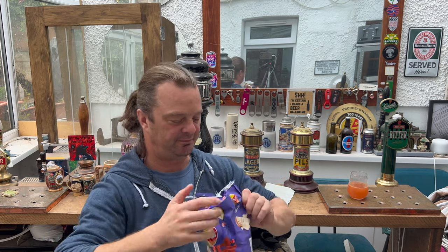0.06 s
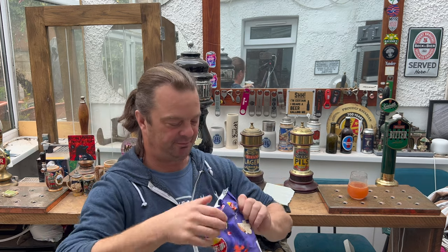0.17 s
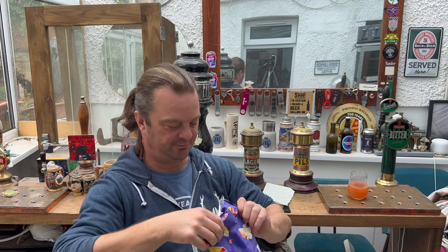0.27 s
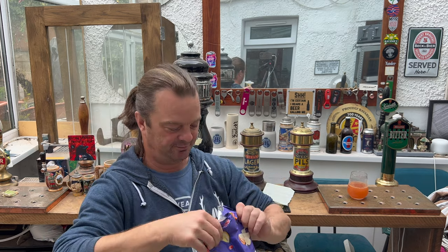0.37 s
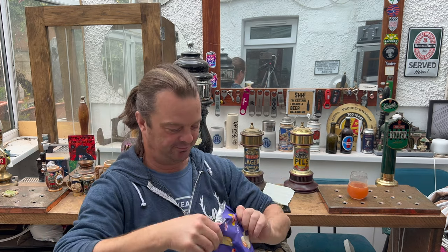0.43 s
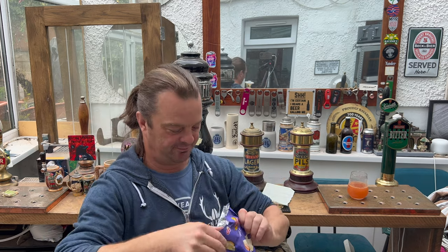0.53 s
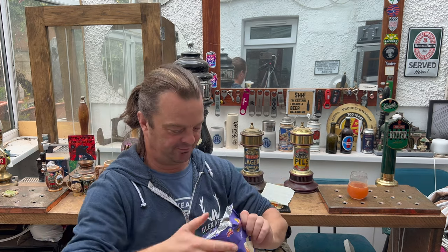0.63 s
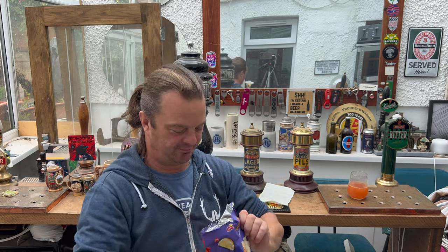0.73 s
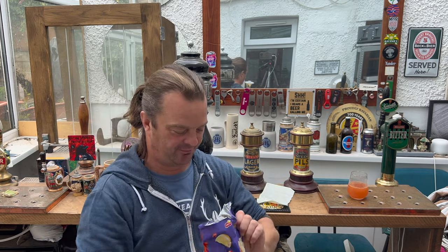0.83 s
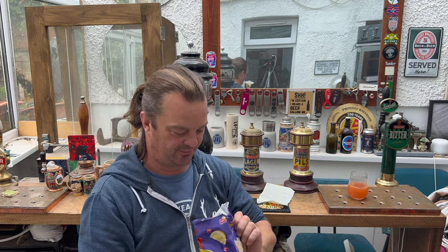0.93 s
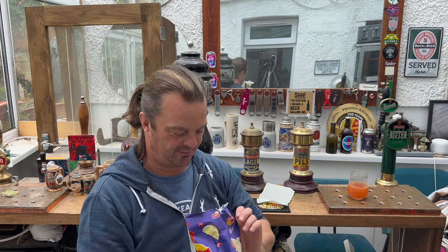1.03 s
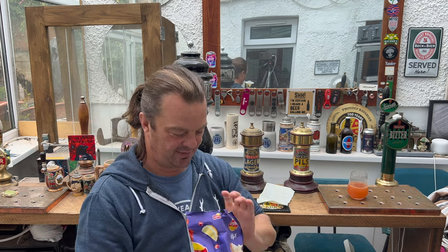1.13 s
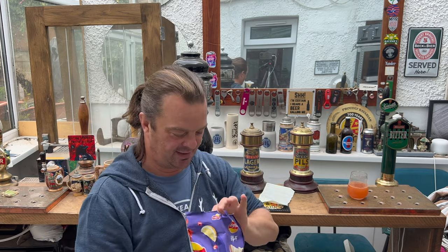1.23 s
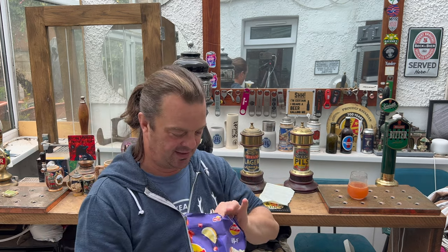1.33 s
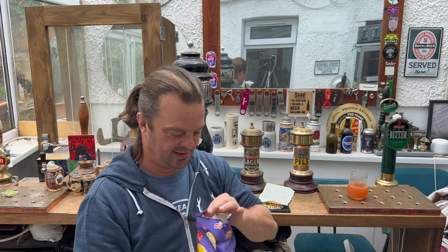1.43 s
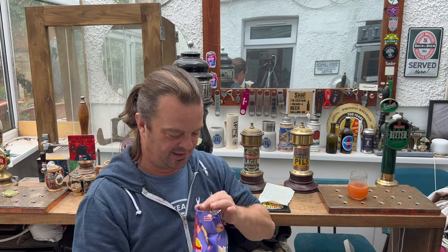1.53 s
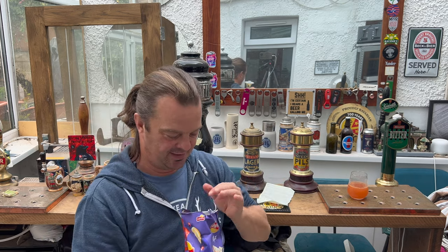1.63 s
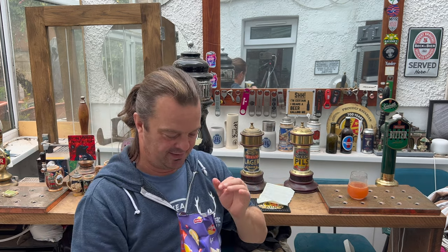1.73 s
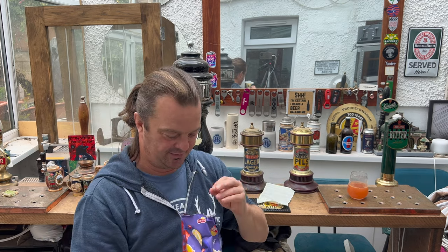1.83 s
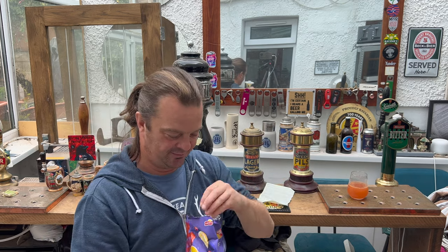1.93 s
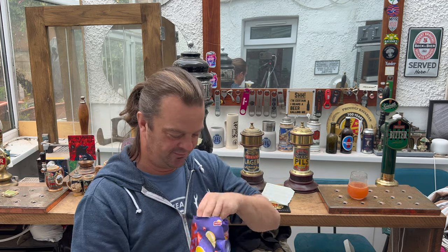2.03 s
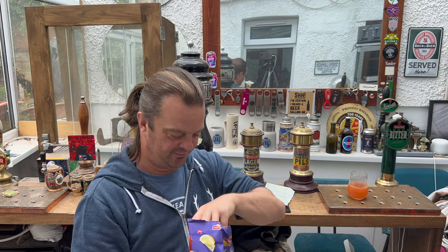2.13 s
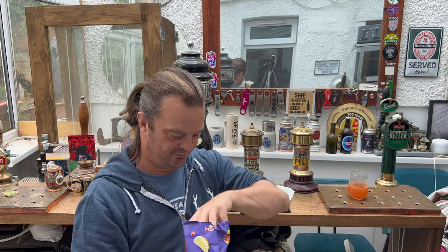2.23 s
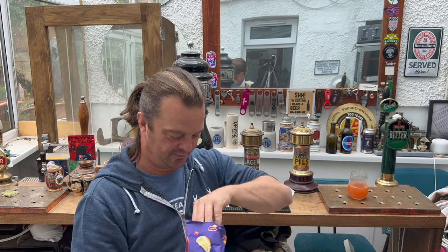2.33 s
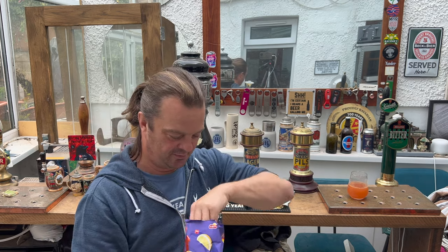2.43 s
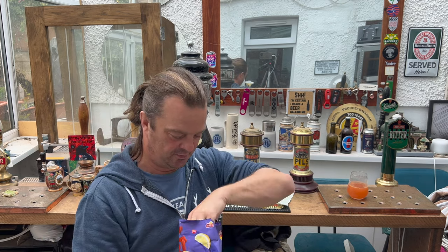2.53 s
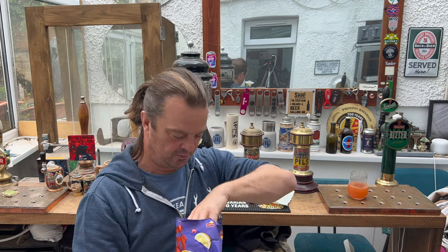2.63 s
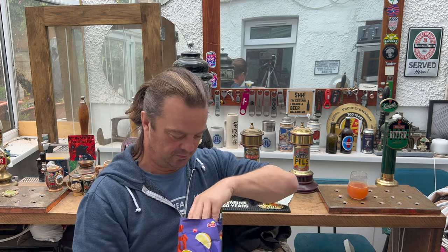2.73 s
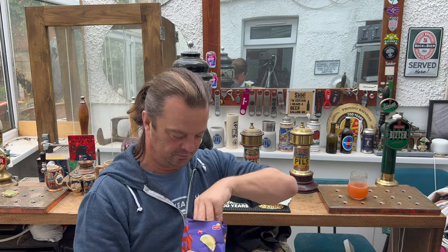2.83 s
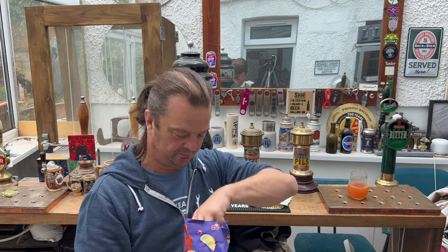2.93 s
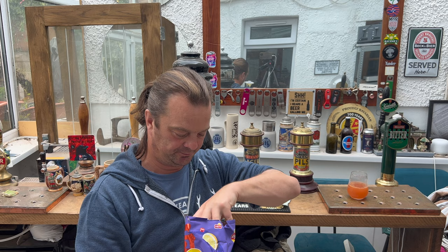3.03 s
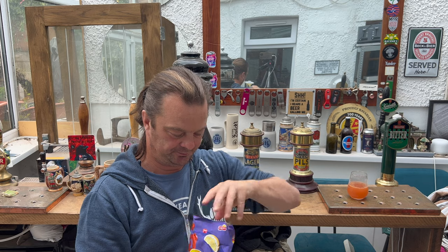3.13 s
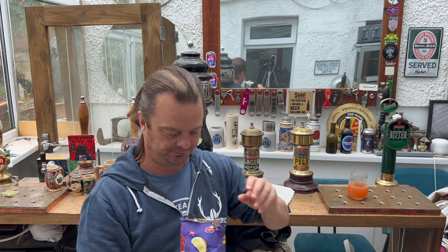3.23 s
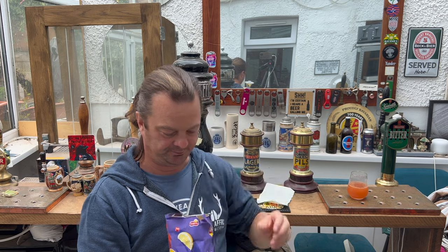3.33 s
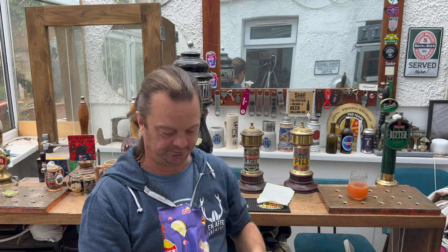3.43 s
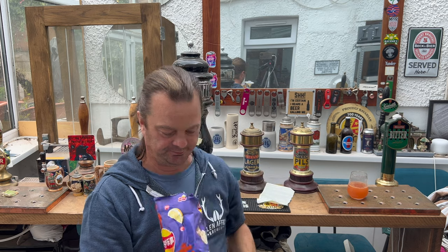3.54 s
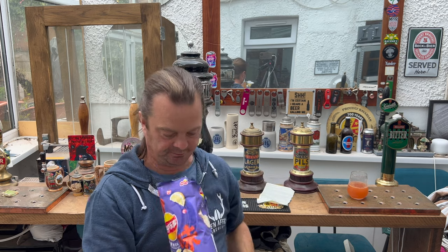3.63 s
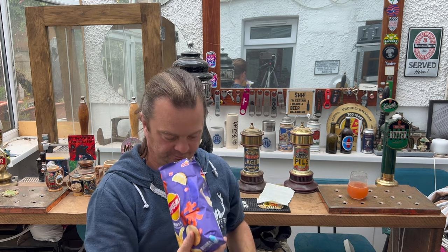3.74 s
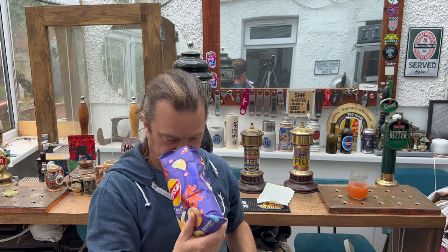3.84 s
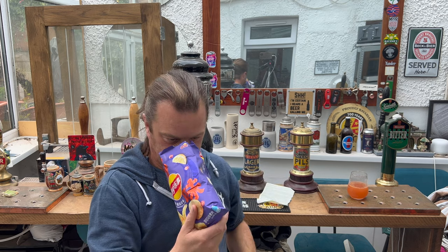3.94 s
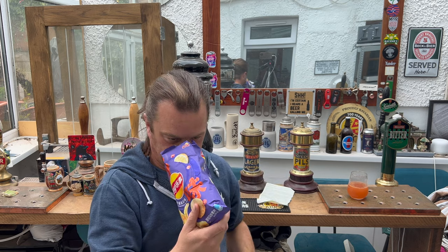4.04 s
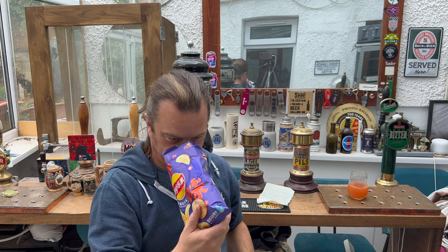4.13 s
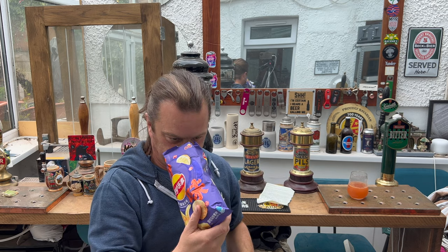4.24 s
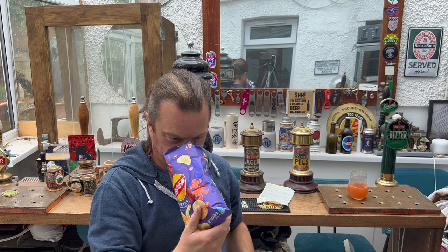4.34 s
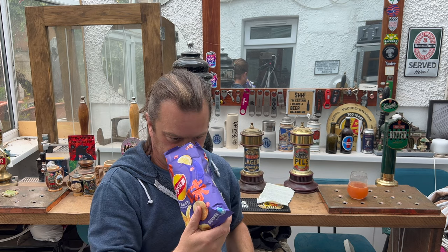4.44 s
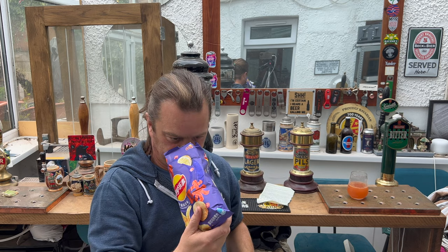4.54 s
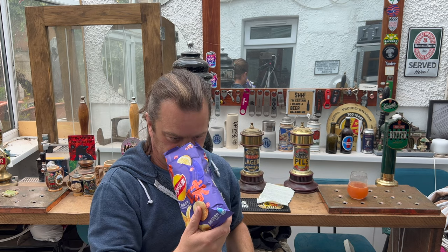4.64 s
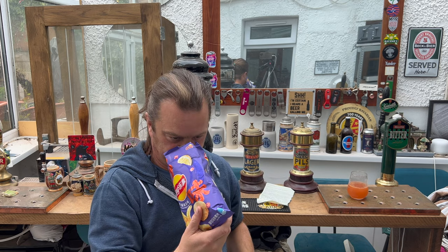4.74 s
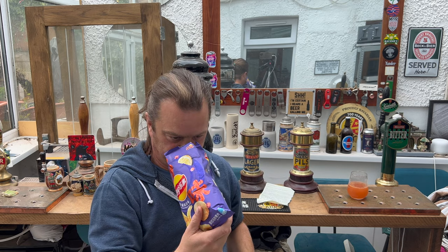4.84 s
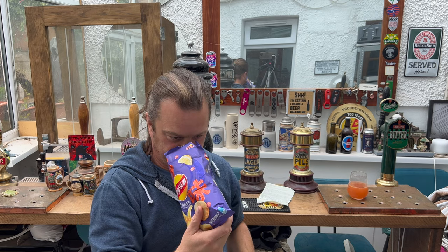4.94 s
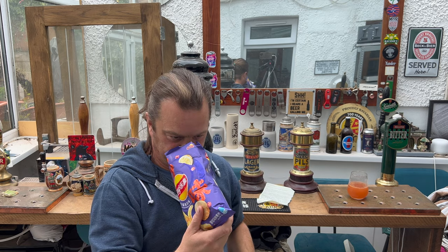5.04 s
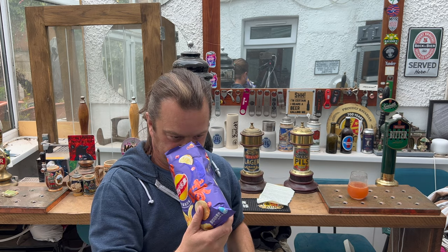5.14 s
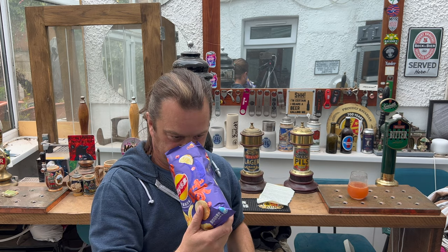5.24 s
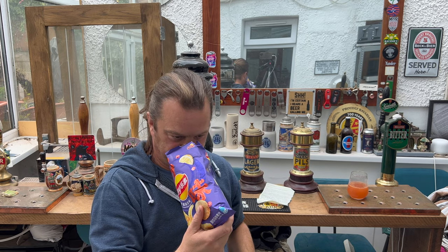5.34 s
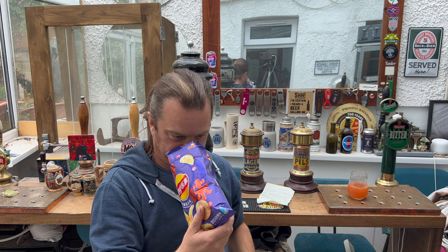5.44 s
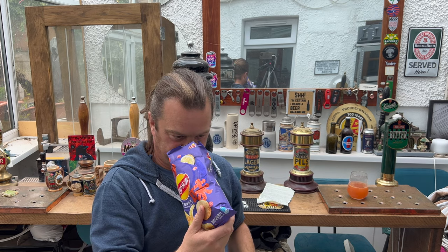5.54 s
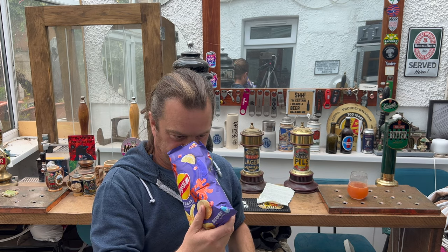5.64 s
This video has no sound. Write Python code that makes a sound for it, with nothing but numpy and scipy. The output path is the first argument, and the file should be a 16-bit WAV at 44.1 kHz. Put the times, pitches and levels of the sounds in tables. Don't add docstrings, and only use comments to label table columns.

```python
import sys
import numpy as np
from scipy import signal
from scipy.io import wavfile
from scipy.ndimage import uniform_filter1d

SR = 44100
rng = np.random.default_rng(int(sys.argv[2]) if len(sys.argv) > 2 else 0)


def wav_record(signal):
    frames = np.transpose(np.atleast_2d(signal))
    bounded = np.clip(frames, -1, 1)
    quanta = np.round(bounded * 32767).astype(np.int16)
    wavfile.write(sys.argv[1], SR, quanta)


def gain_from_decibels(decibels):
    exponent = np.asarray(decibels, float) / 20
    return 10 ** exponent


N = 250488


def evened(x):
    return x / np.sqrt(np.mean(x ** 2) + 1e-20)


def read(points, hz):
    f, value = np.transpose(points)
    return np.interp(np.log(hz + 1), np.log(f + 1), value)


def add(mix, s, sound):
    part = mix[..., max(round(s * SR), 0):][..., :sound.shape[-1]]
    part += sound[..., :part.shape[-1]]


def resonate(x, hz, width):
    return signal.lfilter(*signal.iirpeak(hz, hz / width, SR), x)


def modes(x, table):
    def ring(v):
        return sum((-1) ** k * gain_from_decibels(db) * resonate(v, hz, width) for k, (hz, width, db) in enumerate(table))
    return ring(x) / np.linalg.norm(ring(signal.unit_impulse(SR // 2)))


def ping(hz, width):
    t = np.arange(1500) / SR
    onset = 1 - np.exp(-t * hz * 5.0)
    ring = np.sin(2 * np.pi * hz * t) * onset * np.exp(-np.pi * width * t)
    return ring / abs(ring).max()


def colour(x, points, share=1):
    curve_db = np.maximum(read(points, abs(np.fft.fftfreq(4096, 1 / SR))), -80)
    log_gain = share * np.log(gain_from_decibels(curve_db))
    taps = np.fft.ifft(np.exp(np.conj(signal.hilbert(log_gain)))).real[:2048]
    return signal.oaconvolve(x, taps)[:x.shape[-1]]


def slips(count, spread_s, size_db):
    t = np.arange(2000) / SR
    when = rng.random(len(t)) < count / (spread_s * SR)
    size = gain_from_decibels(size_db * rng.standard_normal((3, len(t)))) * rng.choice([-1, 1], (3, len(t)))
    shape = (1 - np.exp(-(t + 1 / SR) / 0.0004)) * np.exp(-t / spread_s)
    shared, sides = size[0], size[1:]
    burst = (when + 0.21) * (shared + 1.55 * sides) * shape
    return burst / np.linalg.norm(burst) * np.sqrt(2)


def crease(hz, peak_db, pan_db, dull_db=0, fold_ring=0):
    length_s = 0.0026 * np.exp(0.3 * rng.standard_normal())
    burst = slips(count=14, spread_s=np.clip(length_s, 0.0003, 0.009), size_db=2.5)
    dull = signal.lfilter(*signal.butter(2, 5500, fs=SR), burst)
    treble_db = dull_db - 14.5 + 4 * np.log2(hz / 4000)
    patch = dull + gain_from_decibels(treble_db + 11.5) * (burst - dull) + 2.41 * resonate(burst, hz, 1250.)
    if fold_ring:
        patch = patch + fold_ring * resonate(burst, hz, 280.)
    return gain_from_decibels(peak_db + 7.5) * gain_from_decibels([[pan_db / 2 - 0.5], [2.5 - pan_db / 2]]) * patch


# f/Hz, likeness [-1 to 1]
AIR_SAME = [(60, 0.43), (240, 0.68), (950, -0.14), (3770, 0.21), (15000, 0.085)]
# f/Hz, level/dB [per Hz]
AIR = [(15, -53), (30, -39.5), (70, -21), (108, -8.5), (130, -11), (190, -12.5), (300, -10.5), (345, -19.5),
       (375, -7.5), (590, -23.5), (1440, -23.5), (2550, -42), (5500, -50.5), (7300, -42.5), (9500, -60.5),
       (16000, -64.5)]
# f/Hz, width/Hz, level/dB
HUM = [(47.3, 41, -72), (69.2, 14, -72.5), (105, 14.4, -59.5), (180, 24, -67.5), (214.4, 6.7, -69),
       (378.1, 18, -69.5)]


def air():
    frames, hz = N // 512 + 5, np.fft.rfftfreq(2048, 1 / SR)
    a, b, c, d, patches = rng.standard_normal((frames, 1025, 5)).T
    patches = uniform_filter1d(uniform_filter1d(patches, size=20, axis=0), size=8, axis=1)
    patches_db = 0.9 * evened(patches)
    same, left = np.clip(read(AIR_SAME, hz), -1, 1)[:, None], a + 1j * b
    right = same * left + np.sqrt(1 - same ** 2) * (c + 1j * d)
    z = np.array([left, right]) * gain_from_decibels(read(AIR, hz)[:, None] + patches_db)
    wash = gain_from_decibels(-59.5) * evened(signal.istft(z, nperseg=2048, noverlap=1536)[1][:, :N])
    hum = np.zeros(N)
    for f, width, db in HUM:
        line = resonate(resonate(rng.standard_normal(N), f, width), f, width)
        hum += gain_from_decibels(db) * evened(line)
    return (wash + hum) * gain_from_decibels([[1.8], [-1.8]])


# t/s, hold/s, crackle level/dB, bag ring relative level/dB
GRIPS = [(0.0, 0.023, -36, -2), (0.085, 0.025, -44.5, -4.5), (0.164, 0.014, -41, 6),
         (0.218, 0.024, -37, -2.5), (0.292, 0.037, -35.5, -8.5), (0.374, 0.015, -23.5, -10),
         (0.469, 0.048, -44.5, 0.5), (0.607, 0.004, -40, -3), (.72, .012, -56, -17), (.855, 0.021, -39, 7),
         (.89, .012, -30.5, -22), (0.938, 0.022, -36, -1.5), (1, 0.036, -45, 10),
         (1.081, 0.00782, -39.5, -2), (1.249, 0.1, -40, 0), (1.363, 0.045, -20.5, -5.5),
         (1.514, 0.034, -36, 1.5), (1.732, .015, -49.5, 4), (1.99, .03, -49.5, 1.5),
         (2.063, 0.088, -25.5, 1), (2.186, 0.055, -37.5, 1), (2.46, .03, -40, 8), (2.486, 0.18, -39.5, 2),
         (2.8, .012, -70, 15), (2.883, 0.01, -32, 3), (2.962, 0.0047, -29.5, -8), (3.018, 0.083, -43, 4.5),
         (3.23, 0.021, -55.5, 15.5), (3.305, 0.042, -64, 14.5), (3.478, .012, -61, 7)]


def handling():
    close_db_per_s, relax_db_per_s = 900, 381
    t = np.arange(0, N / SR + 0.01, 0.001)
    start, hold, level_db, ring_db = np.transpose(GRIPS)[..., None]
    closing_db = close_db_per_s * np.maximum(start - t, 0)
    relaxing_db = relax_db_per_s * np.maximum(t - start - hold, 0)
    grip_db = level_db - closing_db - relaxing_db
    creep = gain_from_decibels(-61.5 - 2.5 * t - relax_db_per_s * np.maximum(t - 3.45, 0)) ** 2
    fizz = (gain_from_decibels(grip_db) ** 2).sum(0) + creep
    ring = (gain_from_decibels(grip_db + ring_db) ** 2).sum(0) + creep * gain_from_decibels(9.0)

    def lagged(lag_s):
        return signal.lfilter([t[1] / lag_s], [1, -np.exp(-t[1] / lag_s)], fizz) ** 0.72

    push = gain_from_decibels(-23) ** 2 * lagged(0.013)
    squeeze = gain_from_decibels(-28) ** 2 * lagged(0.034) * (t > 1.36)
    return [np.interp(np.arange(N) / SR, t, np.sqrt(power)) for power in (fizz, ring, push, squeeze)]


def small_creases():
    drift = uniform_filter1d(uniform_filter1d(rng.standard_normal(N), size=250), size=250)
    clumps = gain_from_decibels(4 * evened(drift))
    size = gain_from_decibels(2.73 * np.minimum(rng.exponential(1, N), 4)) * rng.choice([-1, 1], N)
    return size * clumps, rng.integers(0, 18, N)


def crackle(sizes, patch, fizz):
    train = evened(sizes * (rng.random(N) < 1800 / SR))
    crack = np.zeros((2, N))
    for k in range(18):
        burst = slips(count=2, spread_s=0.0005, size_db=9.0)[:, :300]
        burst = 0.94 * burst + 1.96 * resonate(burst, rng.uniform(2800, 9150), 970.0)
        crack += signal.oaconvolve((train * (patch == k))[None], burst, axes=1)[:, :N]
    return crack * fizz * gain_from_decibels(-2.0)


# f/Hz, width/Hz, level/dB
BAG = [(587.4, 73, -14.5), (818, 110, -2), (1030, 190, 2.5), (1140, 110, 3), (1400, 180, -7),
       (1700, 67, -7)]


def bag_ring(sizes, patch, ringing):
    blows = evened(sizes * (rng.random(N) < 900 / SR)) * ringing * gain_from_decibels(-21.5)
    ring = np.zeros(N)
    for k, (hz, width, db) in enumerate(3 * BAG):
        panel = gain_from_decibels(db) * ping(hz * rng.uniform(0.935, 0.996), width)
        ring += signal.oaconvolve(blows * (patch == k), panel)[:N]
    return ring


# f/Hz, width/Hz, level/dB
ROOM_LOWS = [(63, 7, -1.5), (114, 27.2, 0.5), (152.9, 23, 4.5), (200, 44, -1)]
# f/Hz, width/Hz, level/dB
ROOM_UPPER_LOWS = [(235, 75.6, -4.5), (301, 41, 1.5), (392, 69, 0.5)]


def moved_air(pushing, squeezing):
    gusts = rng.standard_normal((3, N)) * pushing * gain_from_decibels(-2.5)
    push = modes(gusts[0], ROOM_LOWS) + modes(gusts[1:], ROOM_UPPER_LOWS) * gain_from_decibels(-2.5)
    breath = modes(rng.standard_normal(N) * squeezing, [(66, 14, 0)])
    return push + resonate(breath, 65., 30.)


# f/Hz, t60/s
ROOM = [(60, 1), (300, 0.95), (800, 0.29), (2000, 0.36), (5500, 0.37), (9000, .3), (15000, 0.21)]


def tail():
    taps = np.zeros((2, SR // 2))
    slots = np.arange(160, SR // 2 - 20, 12)
    at = slots + rng.integers(0, 12, (2, len(slots)))
    np.put_along_axis(taps, at, rng.choice([-1., 1.], at.shape), 1)
    hz, t, z = signal.stft(taps, SR, nperseg=256)
    build = 1 - np.exp(-t / 0.0027)
    decay = gain_from_decibels(-60 * t / read(ROOM, hz)[:, None])
    out = signal.istft(z * build * decay, SR, nperseg=256)[1]
    return out / np.linalg.norm(out[0])


def room(x):
    turn = np.arange(N) / SR * 2 * np.pi * 7
    wet = np.zeros((2, N))
    for k in range(3):
        feed = np.sqrt(2 / 3) * np.cos(turn + k * np.pi / 3)
        wet += signal.fftconvolve((x * feed)[None], tail(), axes=1)[:, :N]
    return wet


# t/s, peak level/dB, foil patch f/Hz, left-right level/dB
SNAPS = [(0.0317, -21.5, 4950, -3), (0.102, -27, 5580, 13), (0.163, -32.5, 2320, 9.5),
         (0.232, -18, 4470, 2.5), (0.3055, -16.5, 5524, 11.5), (0.3362, -10, 5890, 4.5),
         (0.371, -7.5, 7500, 10), (0.3988, -14, 6890, 19.5), (0.6034, -28.5, 5030, 18),
         (0.7184, -29, 6800, 5), (0.842, -33, 2433, 6), (0.8936, -20, 2990, 3.5), (0.9459, -24, 2178, 4.5),
         (1.0215, -22.5, 3506, 1.5), (1.0803, -13.5, 6870, 12.5), (1.242, -19, 5090, 3),
         (1.3266, -21.5, 3148, -4), (1.355, -15, 4300, -8.5), (1.381, -22, 2378, 7),
         (1.736, -36.5, 5850, 19), (1.9845, -35.5, 5030, 12), (2.013, -32, 4940, 8.5),
         (2.0596, -22, 5880, 7.5), (2.0852, -9, 7000, 2), (2.122, -9, 5060, 8.5),
         (2.4669, -22.5, 3800, -2.5), (2.6354, -29, 6700, -1), (2.8733, -17, 3780, 4),
         (2.96, -17.5, 5900, 12.5), (3.0702, -20, 4800, 6)]


def snaps():
    crack = np.zeros((2, N))
    for s, peak_db, hz, pan_db in SNAPS:
        add(crack, s, crease(hz, peak_db, pan_db))
    return crack


# t/s, peak level/dB, f/Hz
POPS = [(0.036, -30.5, 1095), (0.164, -27.5, 1070), (0.218, -33.5, 1050), (0.267, -31.5, 1060),
        (0.294, -29, 1100), (0.37, -20, 1140), (0.493, -34.5, 1140), (0.605, -33, 1130),
        (0.867, -25.5, 1130), (0.932, -30.5, 1100), (1.022, -27, 1030), (1.082, -25.5, 1004),
        (1.39, -24, 818), (1.324, -25, 1500), (1.359, -21.5, 796), (1.398, -11.5, 1146), (1.522, -29, 920),
        (1.737, -30.5, 1018), (1.856, -40, 780), (2.062, -27.5, 1060), (2.088, -24.5, 1080),
        (2.123, -14, 1120), (2.249, -23, 1140), (2.468, -25, 1135), (2.551, -27, 904), (2.812, -36.5, 1006),
        (2.873, -22, 1110), (2.959, -20.5, 1105), (3.138, -31, 1040), (3.252, -34, 840)]


def pops():
    out = np.zeros(N)
    for s, peak_db, hz in POPS:
        add(out, s, gain_from_decibels(peak_db - 2.0) * (ping(hz, 120.) + 0.45 * ping(1.6 * hz, 99.0)))
    return out


# t/s, peak level/dB, foil patch f/Hz
FOLDS = [(0.215, -29.5, 2330), (.2944, -29.5, 2600), (0.8752, -27, 1905), (.897, -26, 1922),
         (.947, -26.5, 1847), (1.005, -30, 2210), (1.242, -29.5, 2696), (1.3613, -13.5, 2640),
         (1.736, -33, 2595), (1.362, -20, 1846), (1.383, -18, 1800), (1.3957, -21.5, 1880),
         (1.5256, -26.5, 2350), (2.071, -21.5, 3100), (2.1522, -17.5, 2400), (2.1942, -15.5, 2900),
         (2.2493, -26.5, 2740), (2.445, -37, 3000), (2.5424, -27, 2800), (2.603, -45, 2470),
         (2.81, -38, 2430), (2.8952, -23, 3000), (3.0872, -27, 2650), (3.2255, -40, 2820),
         (3.254, -28.5, 2560), (3.312, -35, 2960), (3.359, -38.5, 2320)]


def folds():
    crack = np.zeros((2, N))
    for s, peak_db, hz in FOLDS:
        add(crack, s, crease(hz, peak_db, pan_db=1.5, dull_db=-5.5, fold_ring=2.5))
    return crack


# t/s, peak level/dB, lowest f/Hz, highest f/Hz, length/ms
HIDDEN = [(3.471, -30.5, 2460, 4200, 3), (3.472, -44, 5540, 8500, 2.5), (3.474, -39.5, 895, 1400, 6.3),
          (3.647, -38.5, 540, 1200, 13), (3.648, -45, 1400, 2085, 6.6), (3.688, -51.5, 6980, 10030, 3.3),
          (3.735, -56.5, 2320, 3330, 14.4), (3.739, -53.5, 4490, 7590, 10), (3.95, -61, 4300, 5500, 14),
          (3.98, -61.5, 2483, 8460, 56), (3.99, -56.5, 890, 2250, 37), (5.027, -49.5, 2210, 4270, 5.7),
          (5.028, -57, 2490, 6200, 9.7), (5.035, -49, 200, 890, 34), (5.345, -40, 2313, 4280, 4.1),
          (5.347, -42, 1490, 6930, 11.3), (5.347, -41, 498, 1475, 15)]


def hidden():
    out, t = np.zeros(N), np.arange(6000) / SR
    for s, peak_db, low_hz, high_hz, ms in HIDDEN:
        grit = rng.standard_normal(len(t)) * np.exp(-t * 1000 / ms)
        tick = 2.2 * np.exp(-ms / 14) * signal.unit_impulse(len(t))
        band = signal.butter(2, [low_hz, high_hz], "band", fs=SR, output="sos")
        burst = signal.sosfilt(band, grit / np.linalg.norm(grit) + tick)
        add(out, s, gain_from_decibels(peak_db) * burst / abs(burst).max())
    return out


# t/s, length/s, from f/Hz, to f/Hz, level/dB
CHIRPS = [
    (4.286, .06, 3900, 3600, -86),
    (4.603, 0.064, 3640, 3130, -75),
]


def bird():
    out = np.zeros(N)
    for s, length, from_hz, to_hz, db in CHIRPS:
        u = np.linspace(0, 1, round(length * SR))
        waver = evened(uniform_filter1d(rng.standard_normal(6000), size=150))[:len(u)]
        hz = from_hz + (to_hz - from_hz) * u + 180. * waver
        swell = np.sin(np.pi * u ** 0.72)
        add(out, s, gain_from_decibels(db) * np.sin(2 * np.pi * np.cumsum(hz) / SR) * swell)
    return out


# t/s, peak level/dB, f/Hz
KNOCKS = [
    (5.04, -48, 261),
    (5.346, -45, 260),
]


def knocks():
    out = np.zeros(N)
    for s, peak_db, hz in KNOCKS:
        add(out, s, gain_from_decibels(peak_db) * ping(hz, 45.0))
    return out


# f/Hz, level/dB [per Hz]
FOIL = [(300, -19), (700, -7), (1300, -4), (1850, 0), (2300, -4), (3400, -8), (6700, -8.5), (8900, -11.5),
        (10000, -14.5), (12500, -16), (15500, -18), (17000, -30.5)]
# f/Hz, level/dB
LEFT_LOUDER = [(60, 2), (180, 2), (550, 3), (1650, 1), (4970, 10), (15000, 0)]


def scene():
    fizz, ringing, pushing, squeezing = handling()
    sizes, patch = small_creases()
    cracks = crackle(sizes, patch, fizz) + snaps() + folds()
    foil = np.array([colour(side, FOIL) for side in cracks]) * gain_from_decibels(8.5)
    ring = bag_ring(sizes, patch, ringing)
    flips, far = pops() + knocks(), hidden() + bird()
    wet = room(gain_from_decibels(-1.5) * (foil.mean(0) + ring + flips) + far)
    direct = foil + ring + gain_from_decibels(2.0) * flips + gain_from_decibels(-3.0) * far
    left, right = direct + wet + moved_air(pushing, squeezing)
    right = np.roll(right, shift=3)
    return np.array([colour(left, LEFT_LOUDER, 0.46), colour(right, LEFT_LOUDER, -0.55)]) + air()


# f/Hz, level/dB
KEPT = [(9400, 30), (9640, -1), (10600, 6.5), (11000, 19), (12900, 12), (13300, -3), (14300, 0.5),
        (14700, 20), (15900, 21), (16300, -18)]


def starve(x):
    hz, t, z = signal.stft(x, SR, window="cosine", nperseg=2048)
    power = (abs(z) ** 2).mean(0)
    band = np.arange(len(hz)) // 16 * 16
    band_db = 10 * np.log10(uniform_filter1d(power, size=16, axis=0, origin=-8)[band] + 1e-20)
    treble_db = 10 * np.log10(power[140:420].mean(0) + 1e-20)
    attack_db = 9.0 * np.maximum(np.diff(treble_db, prepend=0) - 7.5, 0)
    luck_db = 4.9 * rng.standard_normal(power.shape)[band]
    limit_db = np.maximum(treble_db - read(KEPT, hz[band])[:, None] - attack_db, -95.)
    keep = np.clip(band_db + luck_db - limit_db, 0, 1)
    keep[hz < KEPT[0][0]] = 1
    return signal.istft(z * keep, SR, window="cosine", nperseg=2048)[1][:, :N]


def band_limit(x):
    return signal.sosfilt(signal.butter(12, 16960, fs=SR, output="sos"), x)


def record(dry):
    cut = signal.sosfilt(signal.butter(2, 48., "high", fs=SR, output="sos"), dry)
    return band_limit(starve(cut))


dry = scene()
out = record(dry)
wav_record(out)
```